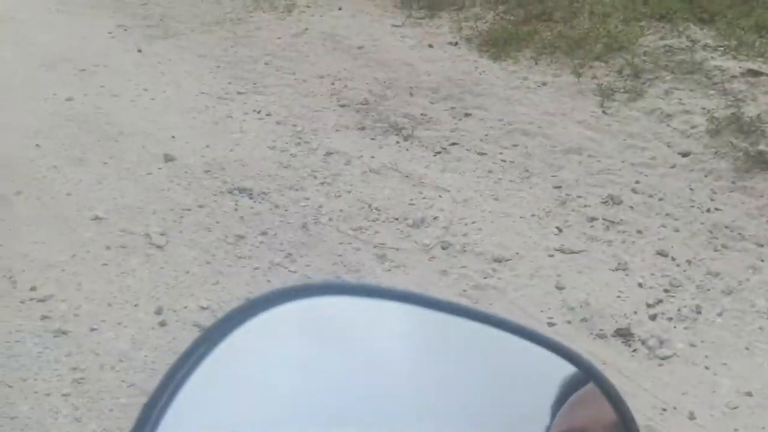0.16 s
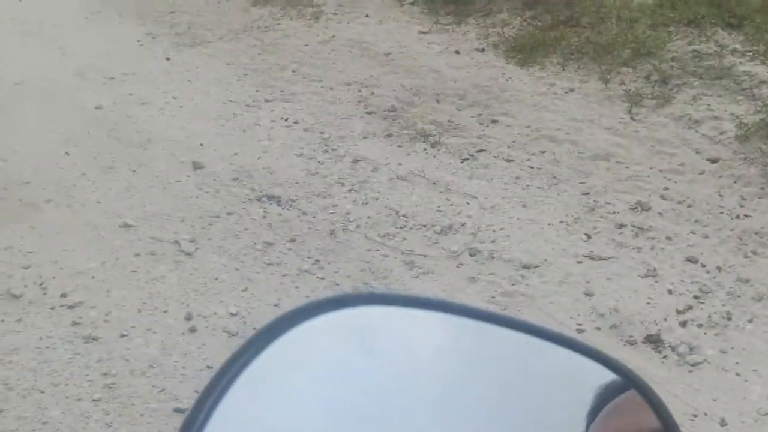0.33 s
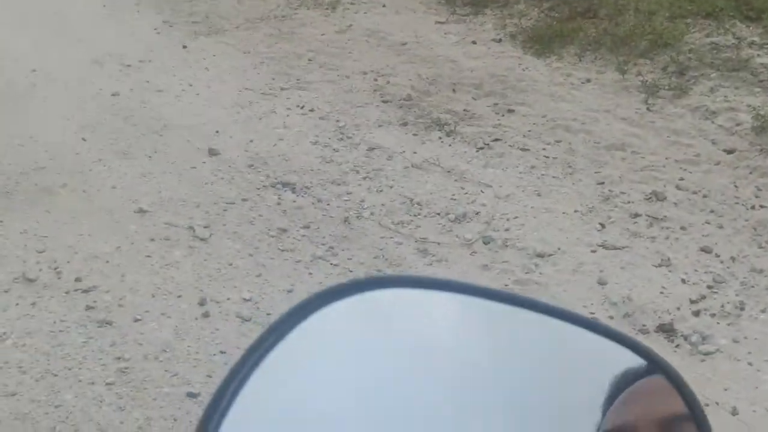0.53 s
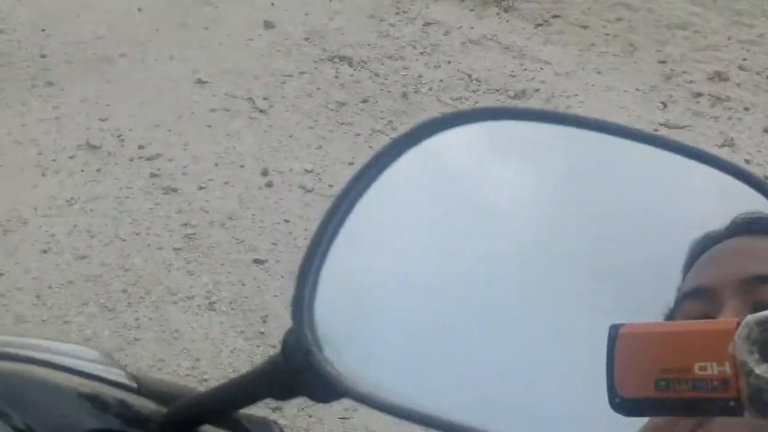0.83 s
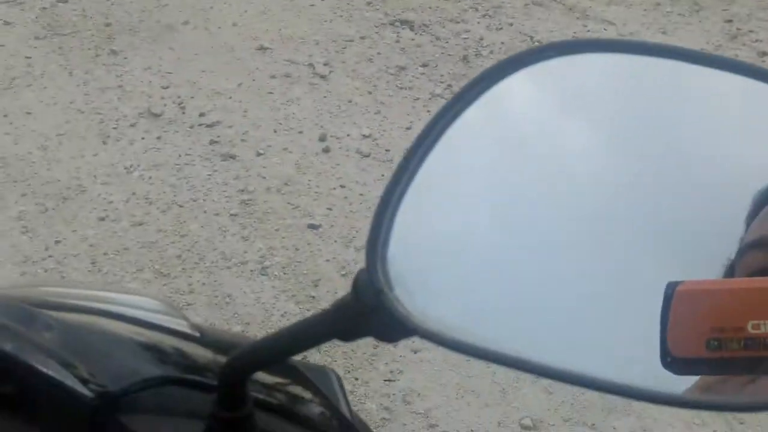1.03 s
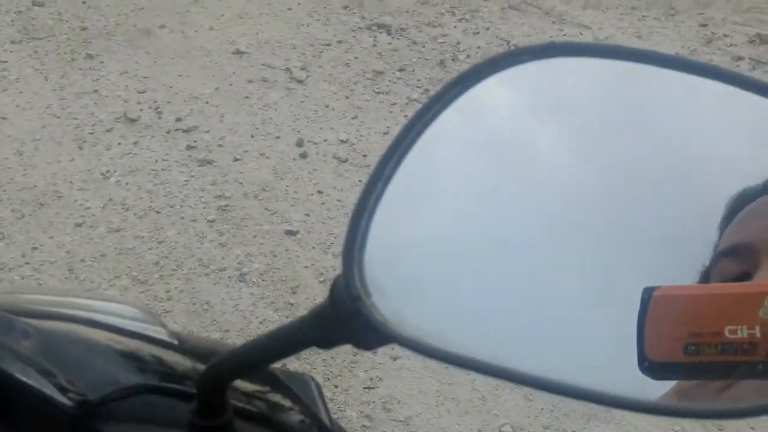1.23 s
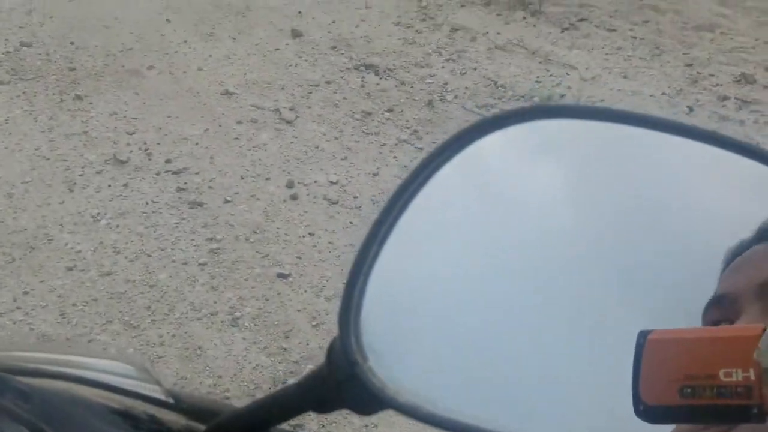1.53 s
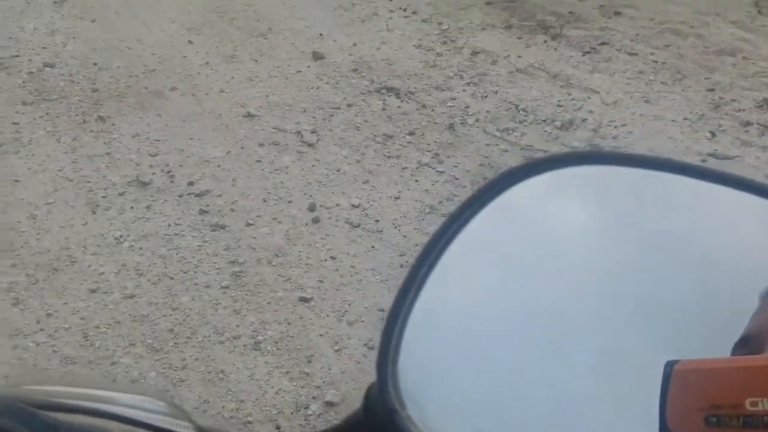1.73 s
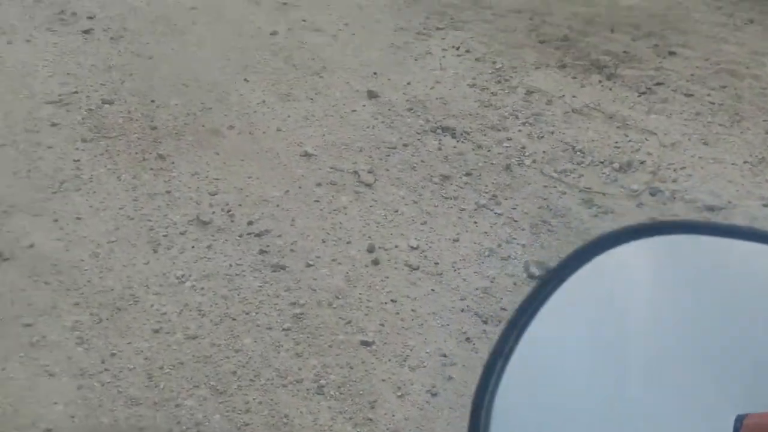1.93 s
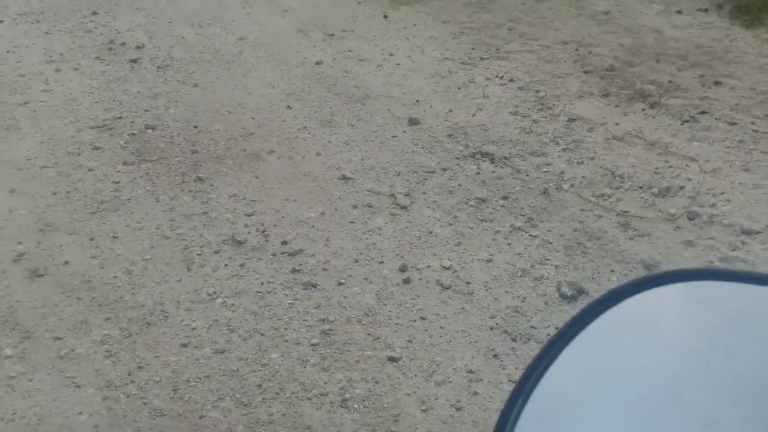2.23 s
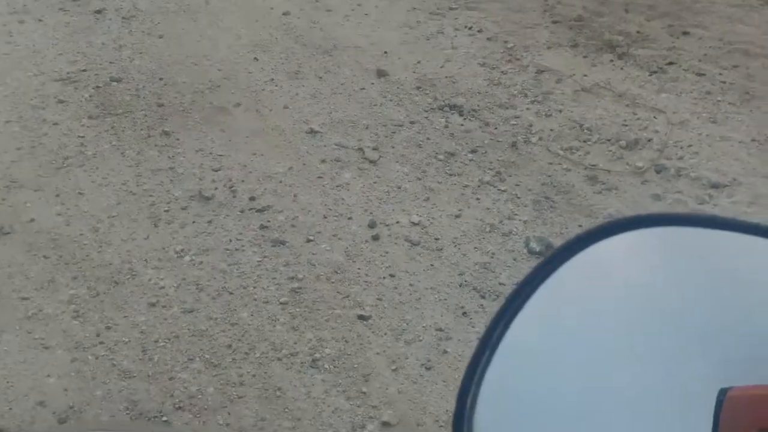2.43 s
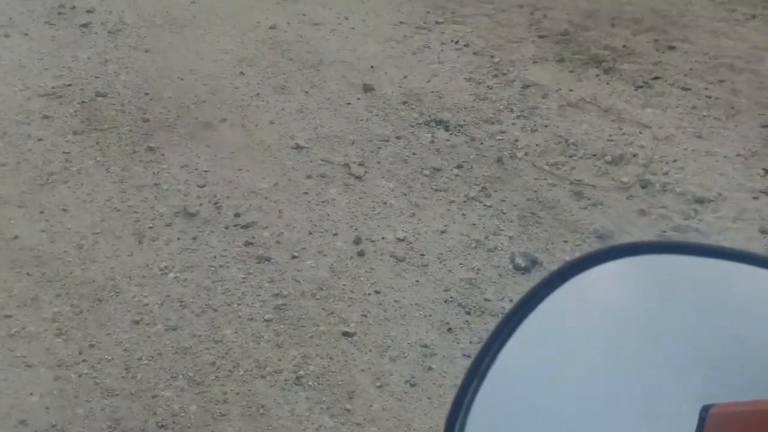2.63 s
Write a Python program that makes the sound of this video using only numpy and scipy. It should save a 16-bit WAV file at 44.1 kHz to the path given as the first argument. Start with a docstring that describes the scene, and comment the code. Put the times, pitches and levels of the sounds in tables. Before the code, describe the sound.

Close motorcycle engine putters at idle with light ticking, revving up right at the end.

```python
"""A single-cylinder four-stroke motorcycle idles, heard from the saddle; the throttle opens at the end.
Each cycle a gas pulse and the piston's push boom in the exhaust; some cycles burn weakly or misfire.
Knocks and the chain ring the casing, valves tick and clack, gears whirr, a metal part keeps ringing.
The intake rasps as the throttle opens. Underneath: air rumble, hand rustles, camera hiss and whine."""
import sys
import numpy as np
from scipy import signal
from scipy.fft import rfft, irfft, next_fast_len
from scipy.io import wavfile

SR = 44100
rng = np.random.default_rng(int(sys.argv[2]) if len(sys.argv) > 2 else 0)


def unload_wav(signal):
    """Save mono or channel-first audio to the path in sys.argv[1] as 16-bit WAV at rate SR, clipped to [-1, 1]."""
    wavfile.write(
        sys.argv[1],
        SR,
        np.round(np.clip(np.atleast_2d(signal).T, -1, 1) * 32767).astype(np.int16),
    )


N = 122157


def undb(db):
    """Decibels to gain."""
    return 10 ** (np.asarray(db) / 20)


def at_rms(x, db):
    """Scale to an rms level."""
    return x * undb(db) / np.sqrt(np.mean(x ** 2))


def curve(rows, t):
    """Linear interpolation between table rows."""
    return np.interp(t, *np.array(rows, float).T)


def bell(x, sigma):
    """Gaussian, peak 1 at zero."""
    return np.exp(-.5 * (x / sigma) ** 2)


def noise(spectrum):
    """Unit-rms noise shaped by (frequency [Hz], relative density [dB]) rows."""
    hz, db = np.array(spectrum, float).T
    f = np.maximum(np.fft.rfftfreq(N, 1 / SR), 1)
    gain = undb(np.interp(np.log(f), np.log(hz), db))
    return at_rms(irfft(rfft(rng.standard_normal(N)) * gain, N), 0)


def wander(rate_hz):
    """Smooth unit-rms random drift, rolling off above rate_hz."""
    return noise([(1, 0), (rate_hz, 0), (2 * rate_hz, -20), (10 * rate_hz, -100)])


def resonate(x, modes):
    """Parallel resonators; neighbours have opposite polarity."""
    size = next_fast_len(2 * N)
    f = np.fft.rfftfreq(size, 1 / SR)
    response = 0
    for k, (hz, width_hz, db) in enumerate(modes):
        damping = 1j * f * width_hz
        response -= (-1) ** k * undb(db) * damping / (hz ** 2 - f ** 2 + damping)
    return irfft(rfft(x, size) * response, size)[:N]


# poor burns; negative gas is sucked back (time [s], gas pulse [x normal], piston push [x normal])
MISFIRES = [(.083, 0.69, 0.83), (.22, -0.6, 1.8), (.71, -0.58, 1.1), (.85, 0.47, 0.86), (.99, -0.5, 1.9),
            (1.13, 0.58, 0.92), (1.27, 0.21, 1.16), (1.41, .25, 1.1), (1.555, 0.54, 1.25),
            (2.43, -0.16, 1.5)]
# pipe and silencer shell resonances (frequency [Hz], bandwidth [Hz], relative gain [dB])
PIPE_MODES = [(67.56, 24.3, -6), (133.7, 22.3, 7.5)]
SHELL_MODES = [(173.7, 20.5, 2), (235.7, 8.5, -7), (283, 22, 0.5), (353.6, 15, -4.5)]


def exhaust(t, cycle, throttle):
    """Gas pulse and piston push boom in the pipe; the pulse's front rings the silencer shell."""
    firings_s = np.interp(np.arange(int(cycle[-1]) + 1), cycle, t)
    burns, pushes = np.ones((2, len(firings_s)))
    for at_s, gas_share, push_share in MISFIRES:
        nearest = np.argmin(abs(firings_s - at_s))
        burns[nearest], pushes[nearest] = gas_share, push_share
    burns += .023 * rng.standard_normal(len(firings_s))
    sigma_s = .0029 * (1 - .043 * throttle)
    gas = sum(burn * bell(t - at_s, sigma_s) for at_s, burn in zip(firings_s, burns))
    gas *= undb(4.5 * throttle)
    push_lag_cycles, front_lead_s = .19, .004
    push = sum(share * bell(cycle - k - push_lag_cycles, sigma=.071) for k, share in enumerate(pushes))
    push *= 1.55 * undb(-20 * throttle)
    front = sum(burn * bell(t - at_s + front_lead_s, sigma=.0007) for at_s, burn in zip(firings_s, burns))
    shell = at_rms(resonate(front, SHELL_MODES), db=-48.5)
    shell *= undb(5.5 * throttle + 3.3 * wander(rate_hz=19))
    return resonate(gas + push, PIPE_MODES) + shell


# valve and piston knocks (lag after gas pulse [cycles], relative level [dB], decay [s])
KNOCKS = [(0.188, -0.5, 0.0037), (0.369, 2, 0.0029), (0.441, -11.5, 0.0024), (0.878, -4, 0.0021)]


def knock_envelope(t, cycle):
    """Valves and piston strike at set crank angles, each blow with random strength."""
    scatter_db = 3
    envelope = np.zeros(N)
    for lag_cycles, db, decay_s in KNOCKS:
        strikes_s = np.interp(np.arange(lag_cycles, cycle[-1], 1), cycle, t)
        for at_s in strikes_s:
            start = int(at_s * SR)
            age_s = t[:min(N - start, SR // 20)]
            strength = undb(db + scatter_db * rng.standard_normal())
            envelope[start:start + len(age_s)] += strength * np.exp(-age_s / decay_s)
    return envelope


# engine casing resonances (frequency [Hz], bandwidth [Hz], relative gain [dB])
CASING_MODES = [(527, 145, -13.5), (582, 48, -2.5), (644, 87, -10), (777, 38, -0.5), (859, 74, -6.5),
                (1118, 98, -15.5), (1361, 66, -16), (1664, 64, -18)]
# valve ticks; chain and gear whirr (frequency [Hz], relative density [dB])
TICK_SPECTRUM = [(500, 0), (1400, -0.5), (2100, -9), (2700, -1), (3500, -12), (5200, -9), (9000, -11.5),
                 (15000, -7)]
WHIRR_SPECTRUM = [(150, 3.5), (400, -0.5), (560, 3), (850, -0.5), (1150, -8.5), (1550, -16.5),
                  (2000, -31.5), (5000, -32)]
# swell of casing, ticks and whirr together (time [s], gain [dB])
MACHINERY_GAIN = [(0, 1), (.3, 0.5), (.52, -1), (.6, 1.5), (.7, 0.5), (.8, 0), (.95, 0.5), (1.1, 1),
                  (1.4, -1), (1.75, -0.5), (2.02, 0), (2.27, -3.5), (2.45, 0), (2.77, -0.5)]


def machinery(t, cycle, throttle):
    """Knocks and the running chain ring the casing; valves tick and gears whirr."""
    knocks, chain = knock_envelope(t, cycle), undb(-8.5)
    drive = (knocks + chain) * rng.standard_normal(N)
    casing = at_rms(resonate(drive, CASING_MODES), db=-51.5)
    ticks = at_rms(knocks * noise(TICK_SPECTRUM), db=-64.5)
    whirr = undb(-50) * noise(WHIRR_SPECTRUM)
    return (casing + ticks + whirr) * undb(6.5 * throttle + curve(MACHINERY_GAIN, t))


# the casing's one long ring (time [s], relative level [dB])
RING_LEVEL = [(0, -47.5), (.04, -50), (.1, -63), (.42, -64), (.48, -48), (.7, -58), (.96, -68), (1.06, -43),
              (1.15, -58), (1.37, -50.5), (1.5, -61.5), (1.72, -47.5), (1.81, -46), (1.92, -56.5),
              (2.2, -45), (2.26, -63), (2.39, -48), (2.76, -49.5)]


def metal_ring(t):
    """A lightly damped part, kept ringing by the engine; it wavers, swells and breaks off."""
    centre_hz, drift_hz, beat_depth = 769, 6.1, .55
    phase = 2 * np.pi * np.cumsum(centre_hz + drift_hz * wander(rate_hz=20)) / SR
    in_phase = np.sin(phase) * (1 + beat_depth * wander(rate_hz=18.6))
    quadrature = np.cos(phase) * beat_depth * wander(rate_hz=12.6)
    return at_rms(in_phase + quadrature, db=-1) * undb(curve(RING_LEVEL, t))


# air rumble (frequency [Hz], relative density [dB])
RUMBLE_SPECTRUM = [(8, -14), (24, -4), (33, 5), (43, -8), (70, -9.5), (120, -30), (200, -30.5), (400, -61),
                   (1000, -81)]
# its swell (time [s], level [dB])
RUMBLE_LEVEL = [(0, -27), (.6, -35), (.8, -25), (1.1, -31.5), (1.55, -28), (1.8, -36), (2.4, -34),
                (2.77, -32.5)]


def air_rumble(t):
    """Moving air rumbles on the microphone."""
    return undb(curve(RUMBLE_LEVEL, t)) * noise(RUMBLE_SPECTRUM)


# hard valve strikes (time [s], level [dB])
CLACKS = [(.144, -38), (0.701, -40), (0.797, -37.5), (.842, -42), (1.119, -41.5), (1.686, -41.5),
          (2.279, -51), (2.671, -35), (2.734, -40)]
# their colour (frequency [Hz], relative density [dB])
CLACK_SPECTRUM = [(200, -14), (450, 10.5), (600, 7), (850, 7), (1100, -9), (1700, -16), (2200, -25),
                  (2750, -17), (3500, -31), (9000, -43)]


def valve_clacks(t, decay_s=.0035):
    """The valve gear strikes harder now and then: sharp, decaying noise bursts."""
    envelope = sum(undb(db) * (t >= at_s) * np.exp(-abs(t - at_s) / decay_s) for at_s, db in CLACKS)
    return envelope * noise(CLACK_SPECTRUM)


# hand rustles (time [s], sigma [s], level [dB])
RUSTLES = [(0.598, 0.018, -43), (.755, 0.028, -45), (0.802, 0.0067, -43), (1.04, 0.0087, -46)]
# their colour (frequency [Hz], relative density [dB])
RUSTLE_SPECTRUM = [(60, -23), (180, 5), (280, -2.5), (400, -7), (800, -25), (1500, -22), (4000, -52)]


def hand_rustles(t):
    """A hand turns the camera: brief swells of dull noise."""
    envelope = sum(undb(db) * bell(t - at_s, sigma_s) for at_s, sigma_s, db in RUSTLES)
    return envelope * noise(RUSTLE_SPECTRUM)


# intake rasp (frequency [Hz], relative density [dB])
INTAKE_SPECTRUM = [(200, 6), (600, 15), (950, 11), (1300, -21), (1800, 0), (2200, -19), (2750, -3),
                   (3500, -27), (9000, -39)]


def intake(cycle, throttle, lag_cycles=.52):
    """One gulp of air a cycle, in proportion to the throttle opening."""
    gulp = bell(cycle % 1 - lag_cycles, sigma=.08)
    return undb(-32) * throttle * gulp * noise(INTAKE_SPECTRUM)


# engine speed (time [s], firing rate [Hz])
FIRING_RATE = [(0, 14.716), (.492, 14.224), (1.142, 14.306), (1.892, 13.76), (2.242, 13.469),
               (2.462, 13.448), (2.612, 14.447), (2.762, 19.148)]
# throttle (time [s], opening [0-1])
THROTTLE = [(0, 0.02), (2.45, 0), (2.6, 0.11), (2.68, 0.22), (2.77, 0.67)]


def scene():
    """Engine, hand and air, in mono."""
    t = np.arange(N) / SR
    cycle = np.cumsum(curve(FIRING_RATE, t)) / SR - .225  # gas pulses fall on whole numbers
    throttle = curve(THROTTLE, t)
    engine = exhaust(t, cycle, throttle) + machinery(t, cycle, throttle)
    engine += metal_ring(t) + valve_clacks(t) + intake(cycle, throttle)
    return (engine + hand_rustles(t) + air_rumble(t))[None]


# camera hiss (frequency [Hz], relative density [dB])
HISS_SPECTRUM = [(100, -11), (2000, 5), (4000, 2.5), (5500, 2.5), (7000, 0.5), (10000, 0.5), (13000, -1.3),
                 (16000, -0.7)]
# electronic whine (frequency [Hz], level [dB])
WHINE_TONES = [(5185, -79), (7882, -75), (8272, -81), (11822, -88), (14716, -86), (15525, -83),
               (15704, -83)]


def record(dry, cutoff_hz=15740):
    """The camera adds hiss and a thin whine, and cuts the top."""
    t = np.arange(N) / SR
    hiss = undb(-57.5) * noise(HISS_SPECTRUM)
    whine = sum(at_rms(np.sin(2 * np.pi * hz * t), db) for hz, db in WHINE_TONES)
    lowpass = signal.ellip(12, .1, 80, cutoff_hz, fs=SR, output="sos")
    return signal.sosfilt(lowpass, dry + hiss + whine)


dry = scene()
out = record(dry)
unload_wav(out)
```